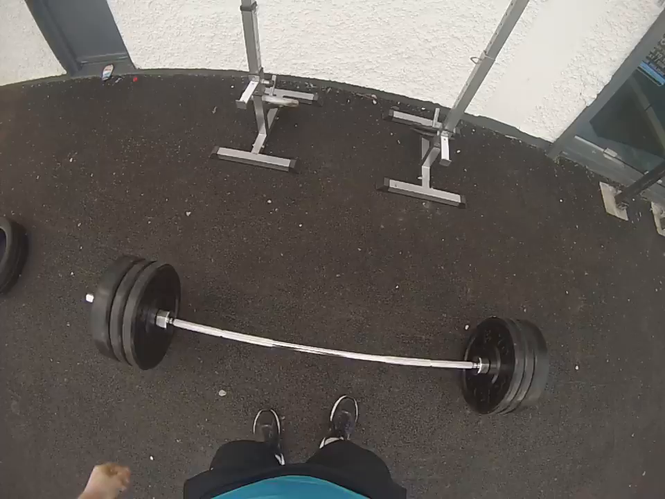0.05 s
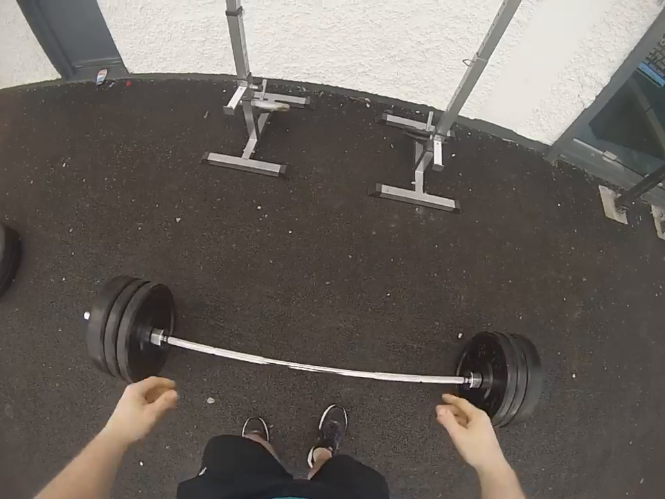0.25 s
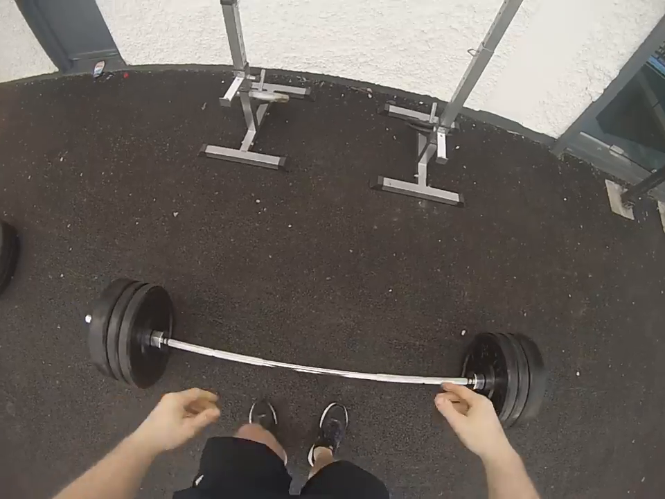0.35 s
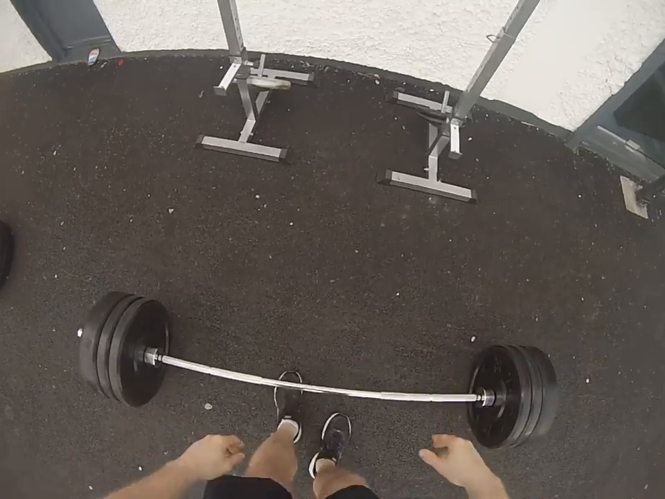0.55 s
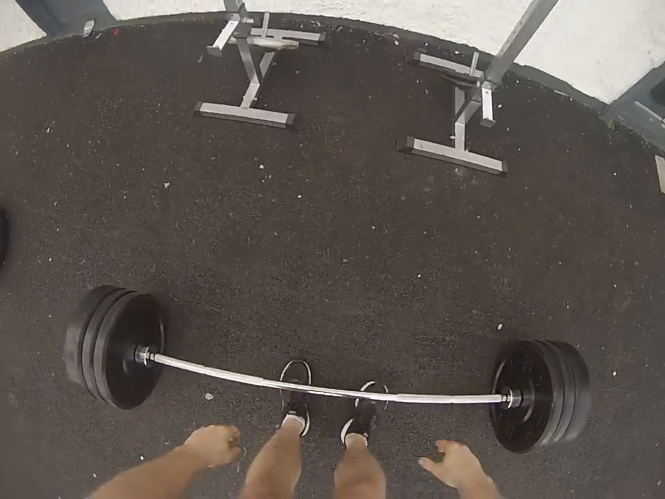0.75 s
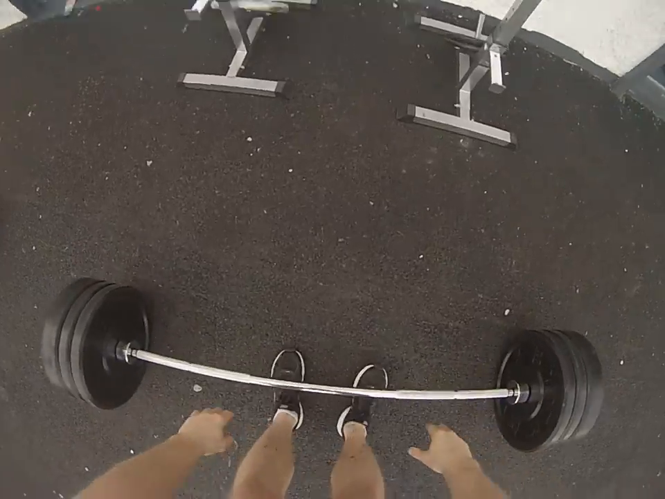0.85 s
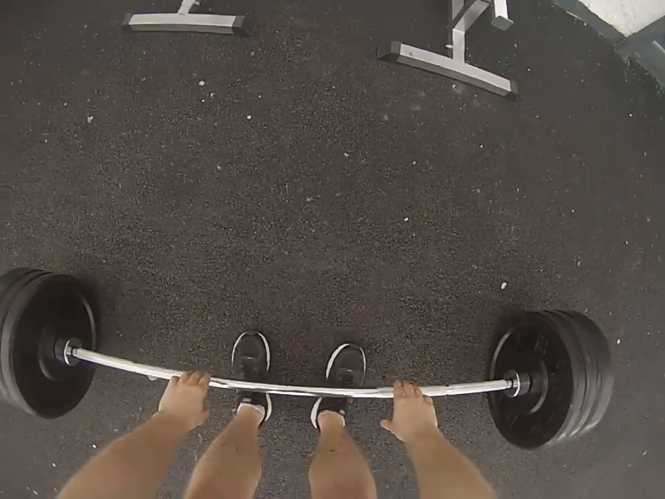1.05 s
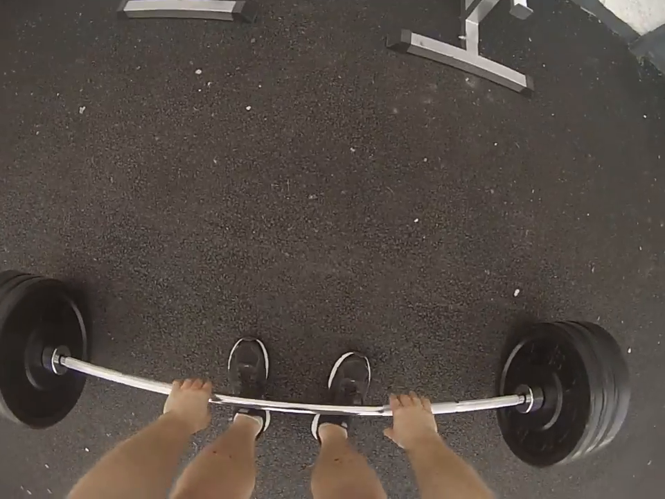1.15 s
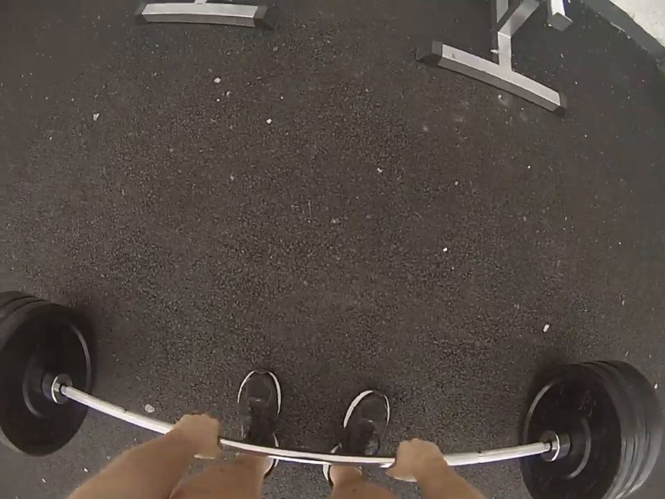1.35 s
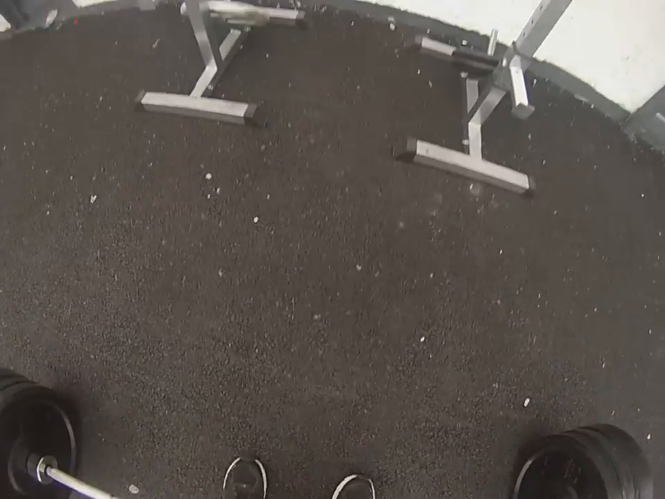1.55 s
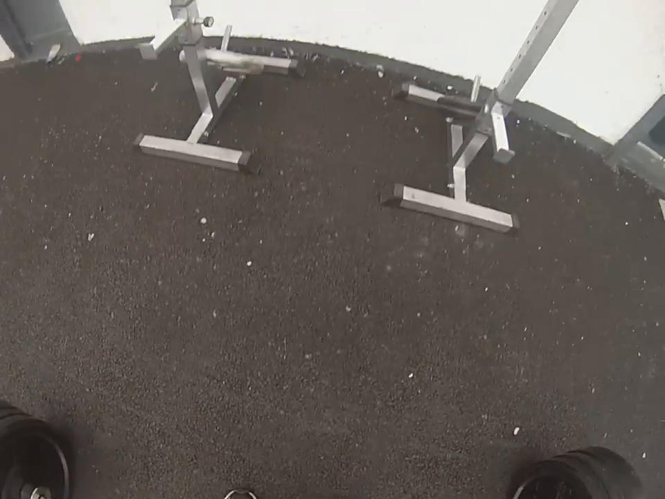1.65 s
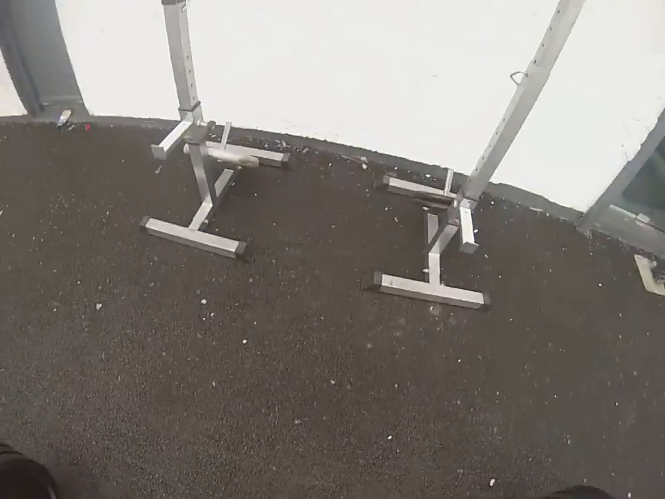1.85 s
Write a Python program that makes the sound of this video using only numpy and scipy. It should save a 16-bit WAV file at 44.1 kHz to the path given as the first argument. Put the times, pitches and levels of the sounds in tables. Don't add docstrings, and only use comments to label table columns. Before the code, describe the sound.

Loose iron plates clank and rattle on a steel barbell, then settle into quiet cloth rustle.

```python
import sys
import numpy as np
from scipy import signal
from scipy.fft import rfft, irfft
from scipy.io import wavfile
from scipy.ndimage import uniform_filter1d

SR = 44100
rng = np.random.default_rng(int(sys.argv[2]) if len(sys.argv) > 2 else 0)


def convert_level_to_amplitude(level_db):
    exponent = np.asarray(level_db, float) / 20
    return 10 ** exponent


def output_pcm(signal):
    pcm = np.clip(np.atleast_2d(signal).T, -1, 1) * 32767
    wavfile.write(sys.argv[1], SR, np.round(pcm).astype(np.int16))


N = 83790

# f/Hz, level/dB
HUM_TONE = [(70, -28.5), (120, 1.5), (1000, -8.5), (1400, -7), (2000, -10), (3500, -2), (7000, -20),
            (15400, -31.5)]
# f/Hz, level/dB
CASE = [(1900, -11), (2600, 2.5), (3000, -20.5), (3400, 5.5), (4000, 5.5), (4350, -11), (4700, -4),
        (6500, -14)]
# t/s, level/dB
RUSTLE = [(.55, -55.5), (.8, -57.5), (.86, -69), (.9, -51), (.96, -63), (1.02, -62), (1.03, -55),
          (1.17, -54), (1.26, -69), (1.285, -55), (1.38, -52), (1.43, -67), (1.45, -52), (1.5, -64),
          (1.57, -55), (1.66, -55.5), (1.75, -52.5), (1.9, -54)]
# t/s, level/dB
RUMBLE = [(0, -51.5), (.06, -39), (.2, -38.5), (.38, -46.5), (.49, -31.5), (.52, -42), (.59, -32.5),
          (.65, -40.5), (.82, -40.5), (.875, -33.5), (.96, -41), (1.25, -47.5), (1.33, -44), (1.5, -47),
          (1.6, -49), (1.7, -39), (1.81, -36), (1.9, -32.5)]
# f/Hz, level/dB
RUMBLE_TONE = [(8.8, -3), (15, 1), (37, -5.5), (71, -14), (92, -29.5), (268, -40), (300, -40.5), (390, -73),
               (660, -120)]
# t/s, length/s, level/dB
TOP_BAND = [(0.032, 0.024, -66), (0.57, 0.016, -65), (0.704, 0.016, -65), (0.81, 0.015, -66),
            (0.825, 0.028, -65), (0.879, .04, -66), (0.971, 0.024, -69), (1.001, .036, -68),
            (1.071, 0.024, -66), (1.204, 0.018, -66), (1.235, .018, -66), (1.308, .02, -66),
            (1.342, .022, -67), (1.474, 0.016, -63), (1.599, 0.02, -67), (1.703, 0.025, -66),
            (1.74, 0.015, -66.5), (1.81, 0.018, -66), (1.878, 0.018, -65)]
# f/Hz, level/dB
TOP_TONE = [(9500, -35), (10500, 4.5), (12300, 5.5), (13200, -14), (14200, 4), (14700, 6)]
# t/s, peak/dB, centre f/Hz, length/s
SCUFFS = [(0.868, -43.5, 3630, 0.028), (0.889, -43, 3550, 0.059), (1.027, -36, 3970, 0.011),
          (1.442, -58, 3470, 0.0073), (1.607, -45, 5000, 0.023), (1.635, -42, 3850, 0.053),
          (1.726, -39, 2880, 0.021), (1.73, -48, 5000, 0.05), (1.734, -36.5, 3500, 0.031),
          (1.853, -43, 1550, 0.062), (1.856, -38, 580, 0.035), (0.734, -53, 1460, 0.48),
          (0.804, -51, 2300, 0.49), (0.899, -49, 1330, 0.33), (1.055, -57, 1400, 0.18),
          (1.89, -43, 706, .02), (1.564, -66, 250, 0.027)]
# t/s, level/dB, pitch f/Hz
THUDS = [
    (1.5418, -21.5, 76),
    (1.438, -46, 110),
    (0.53, -48, 120),
    (1.5465, -37, 190),
    (1.555, -35, 110),
    (1.5745, -43, 190),
    (1.586, -50, 90),
    (.39, -42, 60),
    (0.072, -46, 120),
    (.225, -45, 93),
]
# t/s, f/Hz, peak/dB, t60/s
CLINKS = [(.062, 5500, -53, .1), (.001, 1336, -61.5, 0.19), (.001, 2650, -62, 0.33), (.058, 2325, -49, 0.1),
          (0.133, 3950, -22.5, 0.045), (.145, 4700, -26, 0.065), (.148, 3500, -20, .1),
          (0.155, 4345, -24.5, 0.086), (.168, 318, -31.5, 0.045), (0.18, 5980, -20, 0.057),
          (.182, 4200, -22.5, 0.086), (.183, 5090, -27, 0.08), (.184, 3420, -23, 0.095),
          (.184, 1800, -26.5, 0.055), (0.186, 1340, -35.5, 0.071), (.184, 620, -44, .05),
          (0.207, 4670, -22.5, 0.083), (0.213, 4180, -21.5, 0.068), (.21, 600, -41.5, 0.07),
          (.321, 600, -44.5, 0.055), (0.211, 3196, -27, .07), (.226, 3530, -24.5, 0.06),
          (.222, 390, -44.5, 0.067), (.258, 3430, -26, 0.071), (0.267, 4660, -29, 0.058),
          (0.316, 4170, -15.5, 0.04), (.32, 3500, -16.5, 0.074), (.322, 2200, -26, 0.056),
          (.322, 5250, -44, 0.027), (.322, 1258, -36.5, 0.019), (0.336, 3000, -29.5, 0.14),
          (0.327, 6900, -28, 0.068), (.384, 3560, -23.5, 0.084), (.384, 4650, -32, 0.063),
          (0.387, 320, -42, 0.038), (.426, 3450, -24.5, 0.069), (.43, 4620, -31.5, 0.063),
          (0.431, 1190, -39.5, 0.062), (.428, 305, -53, 0.049), (.468, 3010, -26, 0.058),
          (0.468, 4560, -32, 0.056), (.476, 3780, -32, 0.09), (0.475, 6100, -33, 0.041),
          (.518, 3000, -31.5, 0.082), (.52, 4600, -26, 0.052), (.44, 8400, -37, 0.069),
          (.44, 6900, -34, .06)]
# t/s, peak/dB, brightness/dB per octave, chatter length/s
KNOCKS = [(.001, -60, 22, 0.01), (0.057, -43, 1.5, 0.03), (.131, -37, -17, 0.0072),
          (0.1358, -11.5, -0.5, 0.024), (0.1467, -8.5, 5, 0.02), (0.155, -12, -3, 0.033),
          (.181, -4.5, -4.5, 0.0041), (0.1842, -1.5, 4.5, 0.013), (0.21, -11.5, 5, 0.018),
          (0.218, -16, -6.5, 0.013), (0.26, -14, 6, 0.025), (0.307, -27.5, -12.5, 0.004),
          (0.315, -25.5, 18, 0.021), (0.3226, -5.5, 0.5, 0.0056), (0.325, -19, -2.5, 0.0049),
          (0.336, -29, -7, 0.022), (0.385, -13, 1, 0.0058), (0.3963, -17.5, 9, 0.022),
          (0.4272, -16, 3, 0.015), (0.435, -27.5, 18.5, 0.017), (0.473, -23.5, 11, 0.023),
          (0.476, -41, -1, 0.021), (0.507, -26.5, -7.5, 0.027), (0.521, -19.5, 7, 0.015),
          (.565, -49, 8, 0.0042), (0.591, -38.5, 11.5, 0.014)]
# t/s, level/dB
RATTLE = [
    (0, -41.5),
    (.125, -62),
    (.14, -30),
    (.235, -29),
    (.255, -71),
    (.3, -32),
    (.33, -19),
    (.5, -27),
    (.54, -51),
    (.57, -57),
]
# f/Hz, level/dB
BAR_LEVEL = [(1000, -6), (3000, -12), (6000, -10.5), (8500, -5), (11500, -5.5), (15000, -9)]
# f/Hz, t60/s
BAR_RING = [(1000, .06), (4000, .08), (8000, .15), (11500, .14), (15000, .1)]
# f/Hz, level/dB
PLATES = [(1200, -61.5), (1750, -40.5), (2300, -48.5), (2680, -44), (3000, -61), (3200, -54), (3370, -39),
          (3500, -38), (3750, -45), (4000, -70), (4180, -46), (4660, -40), (5090, -59), (5950, -45.5)]
# f/Hz, level/dB, t60/s
RUBBER = [(325, -42, 0.03), (600, -30, 0.044), (1070, -58, 0.025)]
# f/Hz, level/dB
CLACK = [(300, -63), (800, -40.5), (1450, -24), (1700, -14.5), (2800, -14.5), (3500, -3.5), (8200, -24.5),
         (15400, -48.5)]


def evened(x):
    return x / np.sqrt(np.mean(x ** 2) + 1e-20)


def read(points, hz):
    f, value = np.transpose(points)
    return np.interp(np.log(hz + 1), np.log(f + 1), value)


def curve(points):
    s, level_db = np.transpose(points)
    return convert_level_to_amplitude(np.interp(np.arange(N) / SR, s, level_db))


def coloured(x, points):
    hz = np.fft.rfftfreq(4096, 1 / SR)
    log_gain = np.log(convert_level_to_amplitude(np.maximum(read(points, hz), -100)))
    full = np.r_[log_gain, log_gain[-2:0:-1]]
    response = np.fft.ifft(np.exp(np.conj(signal.hilbert(full)))).real[:2048]
    return signal.oaconvolve(x, response)[:len(x)]


def ring(x, hz, t60_s):
    r, w = 10 ** (-3 / (t60_s * SR)), 2 * np.pi * hz / SR
    return signal.lfilter([np.sin(w)], [1, -2 * r * np.cos(w), r * r], x)


def resonance(x, hz, width_hz):
    return signal.lfilter(*signal.iirpeak(hz, hz / width_hz, SR), x)


def high_pass(x, hz):
    return signal.lfilter(*signal.butter(2, hz, "high", fs=SR), x)


def add(mix, s, sound):
    part = mix[round(s * SR):][:len(sound)]
    part += sound[:len(part)]


def burst(length_s, rise_s=0.00081):
    t = np.arange(9000) / SR
    grit = rng.standard_normal(t.size) * convert_level_to_amplitude(0.72 * rng.exponential(1, t.size))
    return evened(grit) * np.minimum(t / rise_s, 1) * np.exp(-t / max(length_s / 2, .001))


def room_hum():
    return convert_level_to_amplitude(-56.5) * evened(coloured(rng.standard_normal(N), HUM_TONE))


def rumble():
    f = np.fft.rfftfreq(N, 1 / SR)
    tone_db = read(RUMBLE_TONE + [(600, -67)], f)
    noise = irfft(rfft(rng.standard_normal(N)) * convert_level_to_amplitude(tone_db) * (f > 12), N)
    settle = np.minimum(np.arange(N, 0, -1) / 250, 1)
    return evened(noise) * curve(RUMBLE) * settle


def rustle():
    streaks_per_s, streak_db, streak_t60_s = 52, 2, .07
    lumps = evened(uniform_filter1d(rng.standard_normal(N), 250))
    grains = rng.standard_normal(N) * convert_level_to_amplitude(2.1 * lumps)
    streaks = np.zeros(N)
    for f in rng.uniform(2210, 5000, size=40):
        hits = rng.standard_normal(N) * (rng.random(N) < streaks_per_s / SR)
        streaks += ring(hits, f, streak_t60_s)
    cloth = evened(grains) + convert_level_to_amplitude(streak_db) * evened(streaks)
    return evened(coloured(cloth, [(800, -54)] + CASE + [(12000, -44)])) * curve(RUSTLE)


def scuffs():
    out = np.zeros(N)
    for s, db, hz, length_s in SCUFFS:
        width_hz = .28 * hz
        rub = resonance(burst(length_s, rise_s=0.0039), hz, width_hz)
        add(out, s, convert_level_to_amplitude(db + 8) * resonance(rub, hz, width_hz))
    return out


def thuds():
    decay_cycles, turns_scale, bend = 1.6, .57, .19
    out, t = np.zeros(N), np.arange(5000) / SR
    for s, db, hz in THUDS:
        turns = turns_scale * np.log(1 + t * hz / bend)
        push = np.sin(2 * np.pi * turns) * np.exp(-t * hz / decay_cycles)
        add(out, s, convert_level_to_amplitude(db) * signal.lfilter(*signal.butter(4, 380, fs=SR), push))
    return out


def clinks():
    rise_s, shake_depth = 0.0048, 0.53
    out, t = np.zeros(N), np.arange(9000) / SR
    for s, hz, db, t60_s in CLINKS:
        shake = 1 + shake_depth * evened(uniform_filter1d(rng.standard_normal(t.size), size=150))
        swell = convert_level_to_amplitude(db - 60 * t / t60_s) * (1 - np.exp(-t / rise_s))
        add(out, s, shake * swell * 2 * np.sin(2 * np.pi * hz * t))
    return out


def in_room(near):
    t = np.arange(SR // 2) / SR
    noise = signal.lfilter(*signal.butter(1, 5000, fs=SR), rng.standard_normal(t.size))
    tail = noise * convert_level_to_amplitude(-60 * t / .33) * (t > .006)
    return near + convert_level_to_amplitude(-13.5) * signal.fftconvolve(near, tail / np.linalg.norm(tail))[:len(near)]


def iron():
    span = int(.9 * SR)
    blows = np.zeros((len(KNOCKS), span))
    for row, (s, db, _, length_s) in zip(blows, KNOCKS):
        add(row, s, convert_level_to_amplitude(db) * burst(length_s))
    bright_db = np.transpose(KNOCKS)[2]

    rattle_per_s, rattle_spread_db, slide_db = 1200, 4.5, -2
    rattle_gain = curve(RATTLE)[:span]
    sizes = convert_level_to_amplitude(rattle_spread_db * np.minimum(rng.exponential(1, span), 4))
    clicks = evened((rng.random(span) < rattle_per_s / SR) * sizes) * rattle_gain
    rub = convert_level_to_amplitude(-8) * clicks + convert_level_to_amplitude(slide_db) * rattle_gain

    mode_scatter_db, flutter_depth = 3.5, .42
    clock = np.arange(span)
    knots = clock[::int(.008 * SR)]

    def struck(hz, db, t60_s):
        octaves = np.log2(hz / 4000)
        scatter = np.minimum(rng.standard_normal(len(KNOCKS)), 1)
        share = convert_level_to_amplitude(mode_scatter_db * scatter + bright_db * octaves)
        wobble = np.interp(clock, knots, rng.standard_normal(knots.size))
        flutter = 1 - flutter_depth + flutter_depth * wobble
        sliding = convert_level_to_amplitude(2.5 + 2 * octaves) * rub * rng.standard_normal(span)
        rung = ring(share @ blows + sliding, hz, t60_s)
        return convert_level_to_amplitude(db) * flutter * rung / np.sqrt(t60_s * SR / 28)

    bar_hz, bar_shear, split_hz = 10.358, 76.195, 41
    n = np.arange(10, 41) + .5
    bar = np.zeros(span)
    for f in bar_hz * n ** 2 / np.sqrt(1 + (n / bar_shear) ** 2):
        for side in (-.5, .5):
            bar += struck(f + side * split_hz, read(BAR_LEVEL, f), read(BAR_RING, f))

    detune, plate_t60_s = 0.022, .055
    top_db = max(db for _, db in PLATES)
    plates = np.zeros(span)
    for f, db in PLATES:
        for k in rng.uniform(-1.3, 1, size=4):
            plates += struck(f * (1 + detune * k), db - top_db, plate_t60_s)

    force = blows.sum(0) + clicks * rng.choice([-1., 1.], span)
    firm = high_pass(force, 260)
    for f, db, t60_s in RUBBER:
        plates += ring(convert_level_to_amplitude(db) * firm, f, t60_s)

    near = convert_level_to_amplitude(-10) * coloured(bar, CLACK) + convert_level_to_amplitude(-30) * plates + coloured(force, CLACK)
    mix = in_room(high_pass(near, 240))
    return np.pad(mix * convert_level_to_amplitude(4), (0, N - span))


def scene():
    background = room_hum() + rumble() + rustle()
    return (background + scuffs() + thuds() + clinks() + iron())[None]


def top_cut(x):
    return signal.sosfilt(signal.butter(12, 15600, fs=SR, output="sos"), x)


def record(dry):
    t, gate = np.arange(N) / SR, np.zeros(N)
    for s, length_s, db in TOP_BAND:
        gate += convert_level_to_amplitude(db) * ((t > s) & (t < s + length_s))
    hiss = evened(coloured(rng.standard_normal(N), TOP_TONE))
    full = dry + hiss * uniform_filter1d(gate, 60) * convert_level_to_amplitude(2.7)
    edge = signal.firwin(255, 15050, window=("kaiser", 9), fs=SR)
    return top_cut(signal.oaconvolve(full, edge[None], "same"))


dry = scene()
out = record(dry)
output_pcm(out)
```